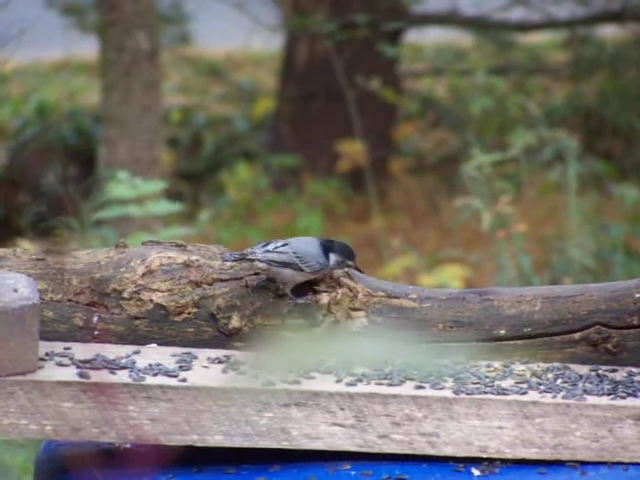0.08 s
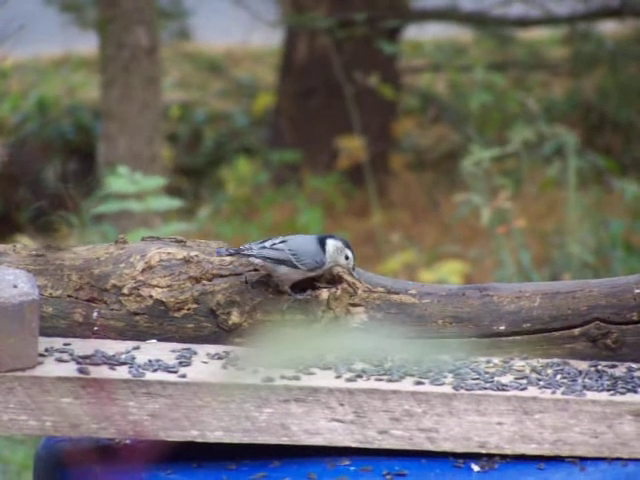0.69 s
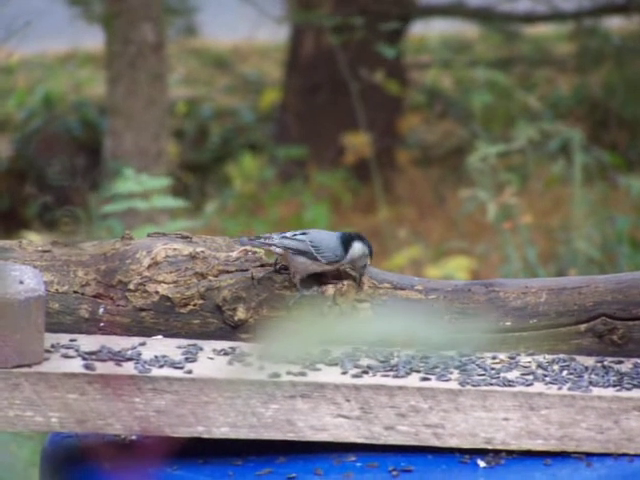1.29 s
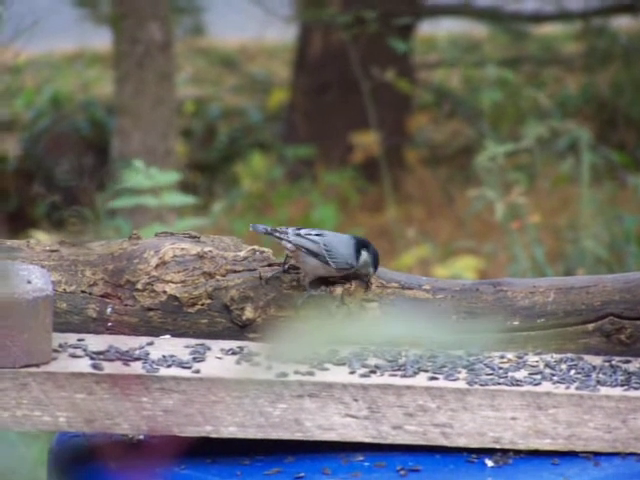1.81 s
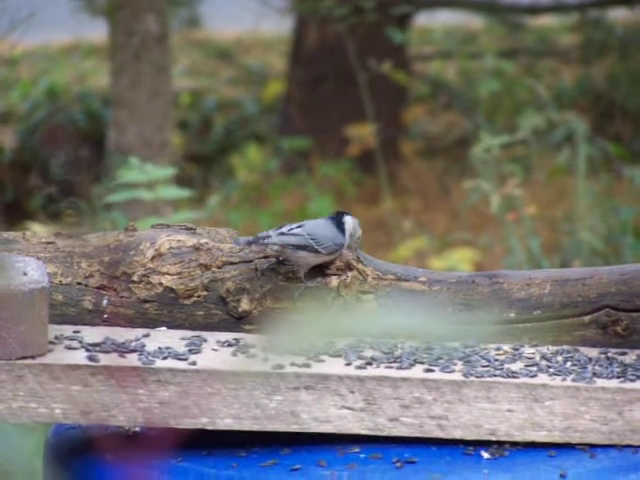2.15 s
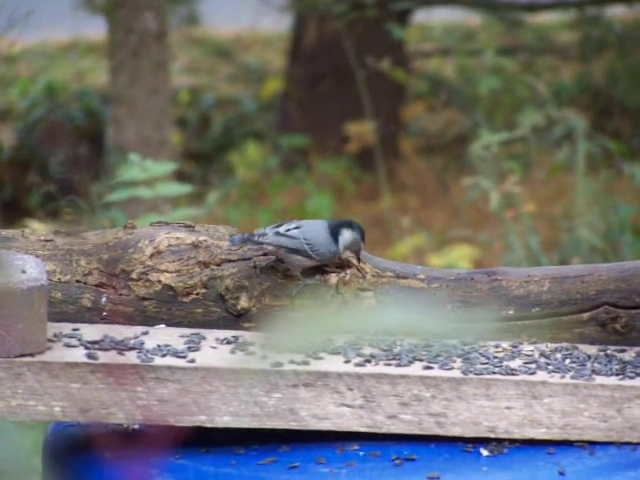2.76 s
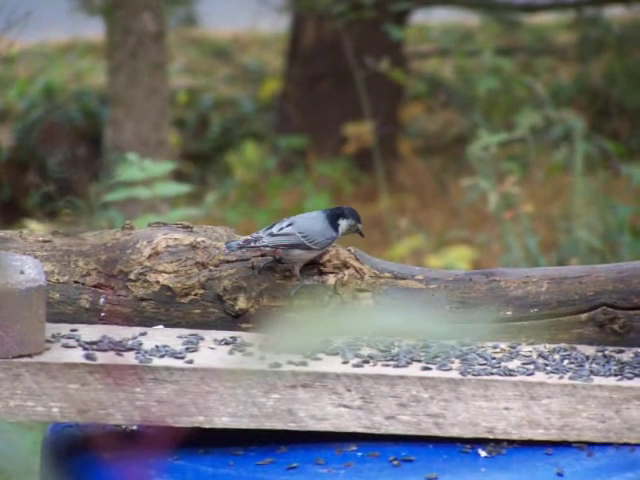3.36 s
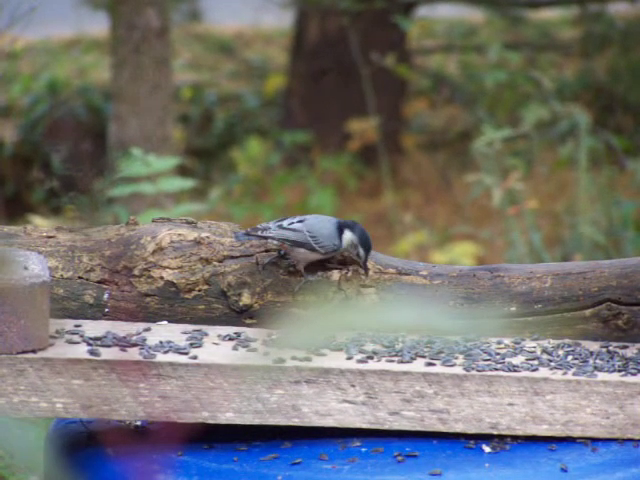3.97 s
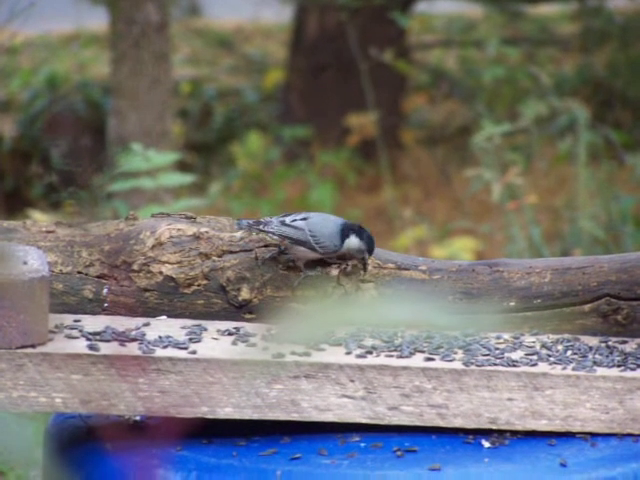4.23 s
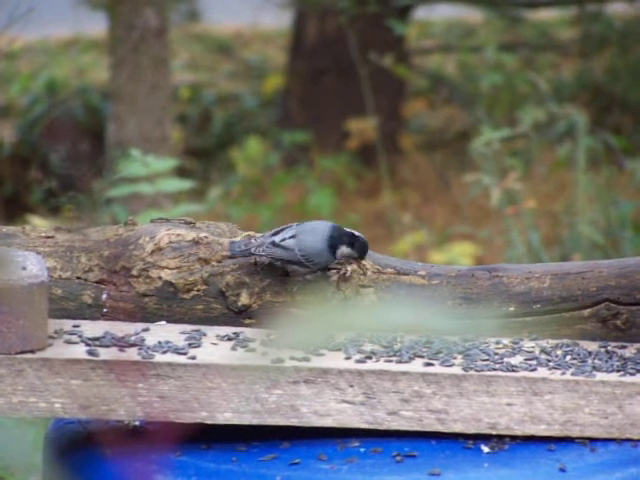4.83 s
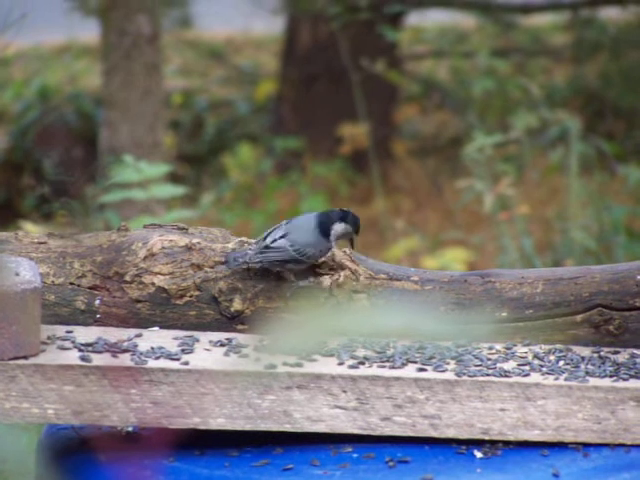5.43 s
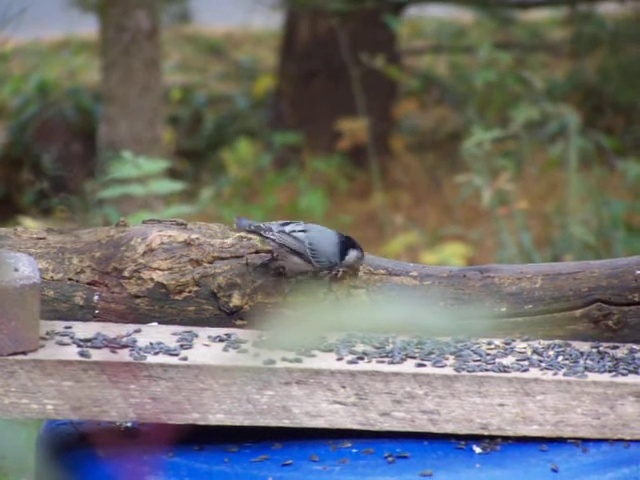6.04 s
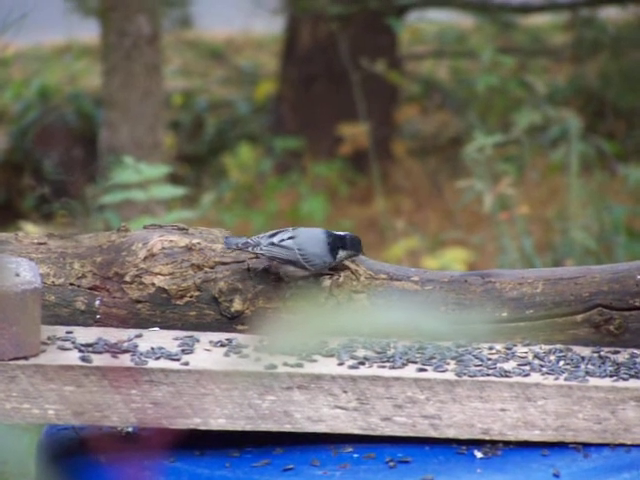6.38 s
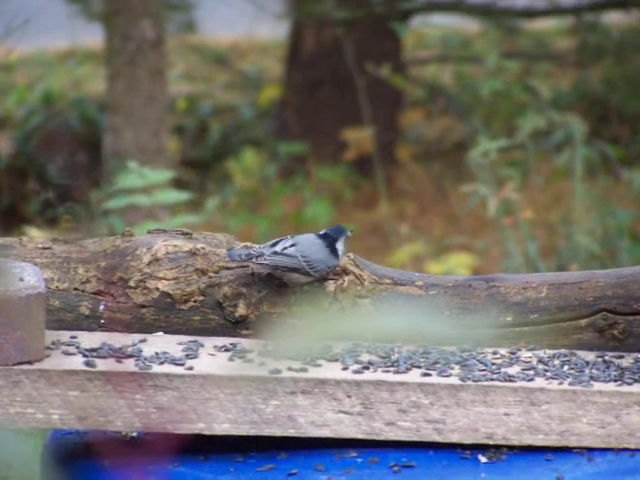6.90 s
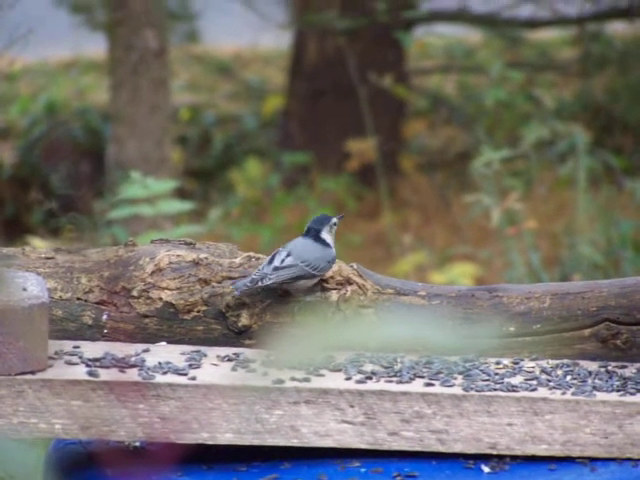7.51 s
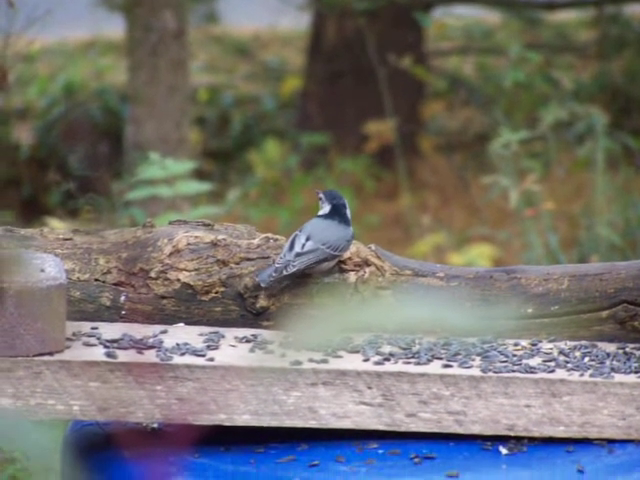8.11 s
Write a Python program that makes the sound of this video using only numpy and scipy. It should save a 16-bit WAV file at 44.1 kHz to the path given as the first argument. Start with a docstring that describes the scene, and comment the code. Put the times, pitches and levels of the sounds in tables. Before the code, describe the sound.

At a backyard feeder, leaves rustle softly over a quiet hush while small birds chip. A nuthatch gives two nasal calls that ring into the trees and taps a seed wedged in a log. Halfway through, one hard blow overloads the nearby microphone. A thin, high whistle follows, then a short rasping rattle and a third nasal call. Near the end come a falling whistle, distant birds and a small crack of husk.

```python
"""Leaves rustle over a quiet hush at a backyard feeder, while small birds chip and pip.
A nuthatch gives two nasal calls that ring out into the trees, and taps a seed wedged in a log.
Just after 4 s one hard blow of its bill overloads the microphone. Another bird whistles, thin and high;
then come a short rasping rattle and the third nasal call. At the end a falling whistle swells
and leaves a faint echo, far birds call and whistle, and the seed husk cracks."""
import sys
import numpy as np
from scipy import signal
from scipy.fft import rfft, irfft, next_fast_len
from scipy.io import wavfile
from scipy.ndimage import uniform_filter1d, map_coordinates

SR = 44100
rng = np.random.default_rng(int(sys.argv[2]) if len(sys.argv) > 2 else 0)


def log_audio(samples):
    """Write samples as a 16-bit WAV file to the path given in sys.argv[1]."""
    # one column per channel
    frames = np.atleast_2d(samples).T
    # limit to full scale, then quantise
    limited = np.clip(frames, -1, 1)
    pcm = np.round(limited * 32767).astype(np.int16)
    wavfile.write(sys.argv[1], SR, pcm)


N = 361179
TIME = np.arange(N) / SR
HIGHEST_HZ = 15300

# tone colour of the outdoor hush: f/Hz, level/dB
HUSH_COLOUR = [(20, -10.5), (45, -10), (65, 2.5), (90, -0.5), (170, -3), (320, -3), (650, -9), (1250, -5.5),
               (1500, 1), (2100, -13.5), (2800, -15), (3400, -10), (3800, -19.5), (6500, -22.5)]
# tone colour of dry leaves and crunching husk: f/Hz, level/dB
CRUNCH_COLOUR = [(200, -14), (400, -3.5), (700, -14), (1100, -5.5), (1520, 4.5), (2000, -4.5), (2400, -2.5),
                 (2900, -9.5), (3400, -19), (3900, -23.5), (6500, -20), (8500, -39.5)]
# swells of rustling leaves: peak t/s, level/dB, time to rise 20 dB/s, time to fall 20 dB/s
LEAF_SWELLS = [(.52, -43, .1, .35), (2.37, -46.5, .35, .2), (4.55, -49.5, 2, 2), (6.05, -45, .65, 3),
               (6.93, -42, .07, .4), (7.44, -37.5, .26, .5), (8.19, -42.5, 1.2, .3)]
# chips of small birds: t/s, level/dB, length/s, top of the rising tone f/Hz
BIRD_CHIPS = [(.02, -35.5, .019, 8700), (.286, -43, .038, 7700), (.8, -51, .045, 6700),
              (2.717, -40.5, .029, 7611), (2.951, -45, .028, 7650), (3.166, -42, .029, 7680),
              (3.433, -41, .042, 7560), (4.466, -41.5, .026, 8000), (4.967, -42.5, .029, 7840),
              (6.119, -42, .02, 7200), (7.191, -43, .033, 7700), (7.28, -46, .032, 6800)]
# soft bumps on the feeder: t/s, level/dB, ring time/s (the time to fade by 60 dB)
FEEDER_BUMPS = [(.305, -40.5, 0.28), (.513, -38.5, 0.27), (1.615, -41, 0.13)]
# bill and claws scraping bark: t/s, level/dB, length/s, f/Hz
BARK_SCRAPES = [(.48, -52, .25, 2400), (6.903, -44, .06, 1250)]
# nasal calls: t/s, length/s, top f/Hz, time until sinking/s, drop/Hz, level/dB, swell/(dB per s)
NUTHATCH_CALLS = [(1.211, 0.37, 886.5, .084, 126, -39, 10), (3.198, 0.39, 863.2, .09, 84.1, -37.5, 4.5),
                  (6.199, .372, 852.7, .145, 103.8, -37, -6)]
# the ringing 4th harmonic (four times the pitch), one list for each call: t/s, level/dB
FOURTH_HARMONIC = [
    [(1.22, -30), (1.265, -25.5), (1.365, -27.5), (1.392, -19.5), (1.402, -28), (1.455, -32),
     (1.486, -19.5), (1.515, -20), (1.53, -31)],
    [(3.215, -24), (3.245, -34), (3.326, -19), (3.339, -28), (3.347, -12.5), (3.358, -18), (3.4, -15.5),
     (3.475, -35), (3.524, -24.5), (3.56, -34)],
    [(6.21, -24.5), (6.222, -19), (6.25, -20), (6.272, -33), (6.29, -22), (6.38, -20), (6.402, -14),
     (6.436, -28.5), (6.54, -33)],
]
# how well the throat passes the other harmonics: f/Hz, level/dB
THROAT_GAIN = [(1600, -1.5), (2600, -8), (4000, -19), (4300, -24.5), (5050, -14), (5700, -28), (6050, -18),
               (6400, -13), (6800, -19), (7600, -26)]
# the throat's colour on the rough edges of a call: f/Hz, level/dB
PUFF_COLOUR = [(1000, -37), (1600, -15.5), (1950, -13.5), (2450, -1), (3200, 0.5), (3900, -22.5),
               (5700, -22), (6400, -17), (9000, -36)]
# bill taps: t/s, level/dB, brightness/(dB per octave), treble limit f/Hz
BILL_TAPS = [(1.442, -25, -1, 2500), (1.792, -28, 1, 3000), (2.791, -25.5, 1, 5000),
             (2.956, -25.5, 2, 6000), (3.134, -24.5, 4, 6000), (3.814, -24, 3, 3600),
             (3.8485, -16.5, -4.5, 1700), (4.227, 2.3, 1, 15300), (4.918, -29, 4, 6000),
             (5.099, -32, 2.5, 5000), (5.299, -29.5, 4, 6000), (6.899, -23.5, 0, 5500)]
# ringing tones of a tap as the microphone picks it up, strongest near 1500 Hz:
# f/Hz, level/dB, ring time for a 0 dB tap/s
TAP_TONES = [(403, -37, 0.14), (508, -24, 0.041), (652, -11, 0.019), (1165.7, -8.5, 0.017),
             (1479, -1.5, 0.022), (1860, -12.5, 0.017), (2264, -8, .016), (2970, -12, 0.02),
             (3420, -7, 0.0098), (2972, -40.5, .11), (3345, -34, 0.13), (4005, -16.5, .014),
             (4530, -9.5, 0.0059), (7515.5, -9, 0.0046)]
# the faint fading echo of the falling whistle (first row), then far whistles:
# t/s, length/s, first f/Hz, last f/Hz, arch/Hz, level/dB, swell/(dB per s)
FAINT_GLIDES = [(7.55, .283, 4573, 4360, -60, -62.5, -45), (3.895, .19, 2230, 2480, 205, -50, 15),
                (4.92, .2, 2620, 2490, 0, -59, -31), (4.92, .2, 2190, 2060, 0, -57.5, -20),
                (7.68, .41, 2313, 2547, -44, -53, 6), (8.05, .138, 2160, 2110, 15, -48, 55)]
# strokes of the rattle: t/s, level/dB, fade time of the slip/s
RATTLE_STROKES = [(4.1185, -31.5, .002), (5.892, -34, .002), (6.084, -26, .005), (6.0905, -17, 0.0027),
                  (6.117, -26, 0.01), (6.143, -28.5, 0.00483), (6.147, -24.5, 0.005),
                  (6.1735, -27.5, 0.002), (6.482, -31, 0.02)]
# ringing tones of the rattle: f/Hz, width/Hz, level/dB
RATTLE_TONES = [(963, 130, -4), (1457, 49, 7), (1627, 58, 6), (2720, 78, -10), (3380, 350, -3),
                (6600, 300, -25.5)]
# cracks of the seed husk: t/s, level/dB, f/Hz, width/Hz, fade time/s
HUSK_CRACKS = [(4.135, -40, 3550, 350, .005), (7.888, -32, 5900, 900, .004),
               (7.902, -31.5, 3700, 1700, .009)]
# path of the thin, high whistle: t/s, f/Hz, level/dB
THIN_PATH = [(5.6, 6350, -53), (5.622, 6380, -40), (5.645, 6150, -28), (5.666, 6085, -21.5),
             (5.678, 5960, -30), (5.765, 5850, -27), (5.795, 5935, -19.5), (5.825, 5850, -22),
             (5.865, 5855, -22), (5.945, 5830, -35), (6.01, 5600, -58)]
# tone colour of the airy haze under that whistle: f/Hz, level/dB
HAZE_COLOUR = [(2700, -19), (3400, 1.5), (4100, -20.5), (5100, -3), (6200, -7.5), (7200, -33.5)]
# path of the whistle that falls as it swells: t/s, f/Hz, level/dB
FALLING_PATH = [(7.21, 4991, -61.5), (7.222, 5145, -51), (7.33, 5080, -45), (7.488, 4710, -36.5),
                (7.534, 4578, -24), (7.556, 4550, -34)]
# echo among the trees: f/Hz, ring time/s
TREE_ECHO = [(300, .5), (1600, 1.2), (3300, 1.17), (5000, 1.2), (7500, 0.44)]
# how the microphone dulls the top treble: f/Hz, level/dB
MIC_GAIN = [(6800, 1), (7500, -6.5), (8300, -15.5), (8900, -29.5), (9300, -74)]


def amp(db):
    """Turns decibels into a number to multiply by."""
    return 10 ** (np.asarray(db) / 20)


def unit(x):
    """Scales a sound to an average strength (rms) of 1."""
    return x / np.sqrt(np.mean(x ** 2) + 1e-20)


def read(points, hz):
    """Looks up a table at a frequency, with octaves evenly spaced."""
    f, value = np.transpose(points)
    return np.interp(np.log(hz + 1), np.log(f), value)


def add(mix, start, sound):
    """Adds a sound to the mix at a start time in seconds."""
    part = mix[max(round(start * SR), 0):][:len(sound)]
    part += sound[:len(part)]


def colour(x, points):
    """Turns each frequency up or down as a table says."""
    size = next_fast_len(len(x) + 2048)
    gain = amp(read(points, np.fft.rfftfreq(size, 1 / SR)))
    return irfft(rfft(x, size) * gain, size)[:len(x)]


def wander(size, per_second):
    """A smooth random wiggle, roughly between -1 and 1."""
    at = np.arange(size) * per_second / SR
    return map_coordinates(rng.standard_normal(4096), [at], order=3, mode="wrap")


def resonate(x, hz, width):
    """Makes a sound ring at one pitch; a narrow width rings longer."""
    r = np.exp(-np.pi * width / SR)
    return 2 * signal.lfilter([1 - r], [1, -r * np.exp(2j * np.pi * hz / SR)], x).imag


def fade(t, rise, fall):
    """Gives a note a soft start and end."""
    ramp = np.minimum((t - t[0]) / rise, (t[-1] - t) / fall)
    return np.sin(np.pi / 2 * np.clip(ramp, 0, 1)) ** 2


def phase_of(hz):
    """Adds up a changing pitch into the angle of a wave."""
    return 2 * np.pi * np.cumsum(hz) / SR


def hush_and_leaves(hush_db=-46.1):
    """A steady hush, with leaves rustling over it in swells."""
    hush = unit(colour(rng.standard_normal(N), HUSH_COLOUR)) * amp(hush_db)
    crackle = rng.standard_normal(N) * amp(2 * wander(N, 350))
    swells_db = [db - 20 * np.maximum((peak - TIME) / rise, (TIME - peak) / fall)
                 for peak, db, rise, fall in LEAF_SWELLS]
    return hush + unit(colour(crackle, CRUNCH_COLOUR)) * amp(np.max(swells_db, axis=0))


def chip(start, db, length, top_hz, lower_hz=5700, upper_hz=9500, upper_db=-6):
    """The two sides of a bird's voice box slide toward each other in pitch, one up and one down."""
    t = np.arange(0, length, 1 / SR)
    span_hz = top_hz - lower_hz
    sweep = (t / length) ** .65 + .11 * wander(len(t), 1200)
    lower = np.sin(phase_of(lower_hz + span_hz * sweep))
    upper = np.sin(phase_of(upper_hz - .62 * span_hz * t / length))
    return start, amp(db) * (lower + amp(upper_db) * upper) * fade(t, .28 * length, .004)


def whistle(path, waver=.002, shimmer_db=1.1):
    """A nearly pure, slightly wavering tone follows a path of pitch and level."""
    times, hz, db = np.transpose(path)
    t = np.arange(times[0], times[-1], 1 / SR)
    pitch = np.interp(t, times, hz) * (1 + waver * wander(len(t), 150))
    level = amp(np.interp(t, times, db) + shimmer_db * wander(len(t), 180))
    return times[0], np.sqrt(2) * level * np.sin(phase_of(pitch)) * fade(t, .007, .008)


def pips(hz=5560, db=-60, length=.075, fall_hz=130, dying_db=11, every_s=.284):
    """A far bird repeats one faint, slightly falling note at an even pace."""
    notes = np.zeros(N)
    for start in np.arange(.07, N / SR, every_s):
        path = [(start, hz, db), (start + length, hz - fall_hz, db - dying_db)]
        add(notes, *whistle(path, waver=.005, shimmer_db=3.5))
    return notes


def bump(start, db, ring_s):
    """A bump on the feeder: a dull thud of low noise that dies away."""
    t = np.arange(SR // 3) / SR
    dull = [(100, -28), (260, 5), (600, -7.5), (1500, -12.5), (4000, -29)]  # f/Hz, level/dB
    thud = unit(colour(rng.standard_normal(len(t)), dull))
    return start, amp(db - 60 * t / ring_s) * thud * fade(t, .0016, .02)


def scrape(start, db, length, hz, width=500):
    """Bill or claws slip in small uneven steps and make the bark ring."""
    t = np.arange(0, length, 1 / SR)
    slips = rng.standard_normal(len(t)) * amp(4 * wander(len(t), 260))
    bark = unit(resonate(resonate(slips, hz, width), hz, width))
    return start, amp(db) * bark * fade(t, length / 10, length / 2)


def nasal_call(call, fourth_levels, climb_hz=40.045, climb_s=.022, sink_s=.16, break_s=.048,
               flutter_db=3, dying_db_per_s=120, rough_db=-40):
    """A stack of harmonics snaps in, sinks and breaks up; the throat favours the 4th harmonic."""
    start, length, top_hz, hold_s, drop_hz, db, swell = call
    t = np.arange(0, length, 1 / SR)
    past_break = t - (length - break_s)
    dying_s = np.maximum(past_break, 0)
    onset = np.exp(-t / .006)
    breakup = np.minimum(np.exp(past_break / .027), 1)
    # the pitch climbs to its top, holds, then sinks ever more slowly
    sink = 1 - np.exp(-np.maximum(t - hold_s, 0) / sink_s)
    hz = top_hz - climb_hz * np.exp(-t / climb_s) - drop_hz * sink
    # it scoops up at the start, droops at the end and shakes most at both
    hz *= 1 - .245 * onset - 1.7 * dying_s + .002 * wander(len(t), 70)
    shake = (.0025 + .022 * (onset + breakup)) * wander(len(t), 600)
    phase = phase_of(hz * (1 + shake))
    fourth_db = np.interp(start + t, *np.transpose(fourth_levels)) - 1.5
    tone = amp(fourth_db) * np.sin(4 * phase)
    others_db = db + 2.2 + swell * (t - length / 2)
    for k in (2, 3, 5, 6, 7, 8, 9):
        flutter = flutter_db * wander(len(t), 80)
        tone += amp(others_db + read(THROAT_GAIN, k * hz) + flutter) * np.sin(k * phase)
    tone *= np.sqrt(2) * amp(-dying_db_per_s * dying_s)
    # where the voice membranes lose their regular beat, puffs of noise take over
    puffs = unit(colour(rng.standard_normal(len(t)) * (1 + np.cos(phase)), PUFF_COLOUR))
    roughness = amp(rough_db) * (np.exp(-t / .06) + breakup)
    return start, tone * fade(t, .016, .024) + puffs * roughness * fade(t, .0035, .021)


def tap(start, db, brightness, treble_hz, crunch_db=-21, crunch_s=.004):
    """The bill strikes with a short ring and the husk crunches; hard contacts favour the high tones."""
    t = np.arange(SR // 6) / SR
    decay = 60 * t / amp(.13 * db)  # strong blows ring longer
    ring = np.zeros(len(t))
    for hz, tone_db, ring_s in TAP_TONES:
        tilt_db = brightness * np.log2(min(hz, 4000) / 1500)
        ring += amp(tone_db + tilt_db - decay / ring_s) * np.sin(2 * np.pi * hz * t)
    crunch = unit(colour(rng.standard_normal(len(t)), CRUNCH_COLOUR))
    crunch *= amp(crunch_db + brightness) * np.exp(-t / crunch_s)
    strike = (ring + crunch) * (1 - np.exp(-t / .00036))
    contact = signal.butter(2, [130, min(treble_hz, HIGHEST_HZ)], "bandpass", fs=SR, output="sos")
    return start, amp(db) * signal.sosfilt(contact, strike)


def faint_glide(start, length, first_hz, last_hz, arch_hz, db, swell):
    """A faint tone, an echo or a far whistle, glides along one arch as it swells or fades evenly."""
    progress = np.linspace(0, 1, 16)
    hz = first_hz + (last_hz - first_hz) * progress + arch_hz * np.sin(np.pi * progress)
    level_db = db + swell * length * (progress - .5)
    path = np.transpose([start + length * progress, hz, level_db])
    return whistle(path, waver=.006, shimmer_db=2.5)


def rasp(start, db, slip_s, grit=.23):
    """A catch and a short gritty slip set the rattle's tones ringing."""
    t = np.arange(SR // 10) / SR
    slip = grit * rng.standard_normal(len(t)) * np.exp(-t / slip_s) / np.sqrt(slip_s * SR)
    slip[0] += .5  # the catch
    ring = sum(amp(tone_db) * resonate(slip, hz, width) for hz, width, tone_db in RATTLE_TONES)
    ring *= 1 - np.exp(-t / .0032)
    return start, amp(db) * ring / np.std(ring[:SR // 100])


def crack(start, db, hz, width, fade_s):
    """A sliver of husk splits: a tiny burst that rings at the sliver's own pitch."""
    t = np.arange(SR // 20) / SR
    burst = rng.standard_normal(len(t))
    sliver = unit(resonate(resonate(burst, hz, width), hz, width))
    return start, amp(db) * sliver * np.exp(-t / fade_s)


def hazy_whistle(path, haze_db=-24.5):
    """A smooth whistle with a faint airy haze that follows its strength."""
    start, tone = whistle(path, waver=.0016, shimmer_db=.8)
    strength = np.sqrt(abs(uniform_filter1d(tone ** 2, SR // 10)))
    haze = unit(colour(rng.standard_normal(len(tone)), HAZE_COLOUR))
    return start, tone + amp(haze_db) * strength * haze


def hoarse_call(start=7.41, length=.48, db=-39, hz=3290, shake=.0474):
    """A far, hoarse bird: its pitch shakes so fast that the tone smears into a rasp."""
    t = np.arange(0, length, 1 / SR)
    pitch = hz * (1 + shake * wander(len(t), 800))
    return start, amp(db) * np.sin(phase_of(pitch)) * fade(t, rise=.14, fall=.2365)


def trees(x, early_db=7, early_s=.039, echoes_per_s=3000):
    """Trunks scatter the sound: strong near echoes, then a long thin tail that loses its treble."""
    t = np.arange(2 * SR) / SR
    echoes = rng.standard_normal(len(t)) * (rng.random(len(t)) < echoes_per_s / SR) * (t > .006)
    echoes *= 1 + amp(early_db) * np.exp(-t / early_s)
    hz, when, bands = signal.stft(echoes, SR, nperseg=256)
    bands *= amp(-60 * when / read(TREE_ECHO, hz)[:, None])
    tail = signal.istft(bands, SR, nperseg=256)[1]
    return signal.fftconvolve(x, tail / np.linalg.norm(tail))[:N]


def scene():
    """Birds and feeder sounds arrive directly and by way of the trees, over the hush and leaves."""
    calls, whistles, far, chips, feeder = np.zeros((5, N))
    for call, fourth_levels in zip(NUTHATCH_CALLS, FOURTH_HARMONIC):
        add(calls, *nasal_call(call, fourth_levels))
    add(whistles, *hazy_whistle(THIN_PATH))
    add(whistles, *whistle(FALLING_PATH))
    for row in FAINT_GLIDES:
        add(far, *faint_glide(*row))
    add(far, *hoarse_call())
    for row in BIRD_CHIPS:
        add(chips, *chip(*row))
    for sound, table in ((tap, BILL_TAPS), (crack, HUSK_CRACKS), (scrape, BARK_SCRAPES),
                         (rasp, RATTLE_STROKES), (bump, FEEDER_BUMPS)):
        for row in table:
            add(feeder, *sound(*row))
    far += pips()
    direct = amp(-.5) * calls + amp(-.3) * whistles + amp(1.5) * far + chips + feeder
    scattered = (amp(-9.5) * calls + amp(-31) * whistles + amp(-8) * far
                 + amp(-1.5) * chips + amp(-29.5) * feeder)
    return (direct + trees(scattered) + hush_and_leaves())[None]


def record(dry, overload=.96, ceiling=.79):
    """The microphone squashes the hard blow and dulls the treble; the recorder cuts peaks and highs."""
    squashed = dry[0] / (1 + (dry[0] / overload) ** 6) ** (1 / 6)
    clipped = np.clip(colour(squashed, MIC_GAIN), -ceiling, ceiling)
    treble_cut = signal.firwin(255, HIGHEST_HZ, window=("kaiser", 9), fs=SR)
    return signal.oaconvolve(clipped, treble_cut, "same")[None]


dry = scene()
out = record(dry)
log_audio(out)
```